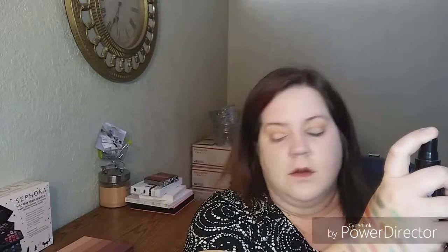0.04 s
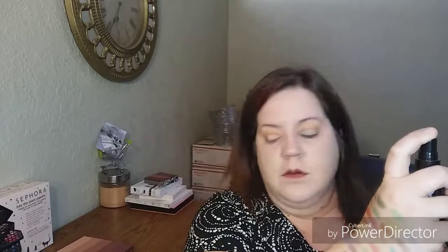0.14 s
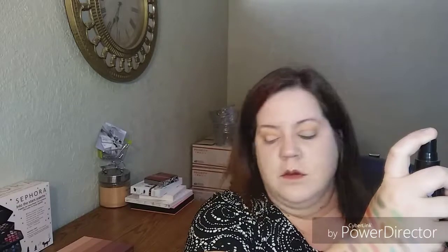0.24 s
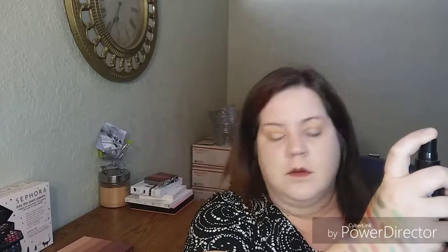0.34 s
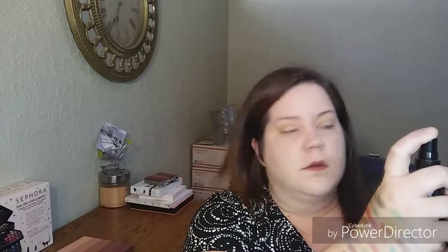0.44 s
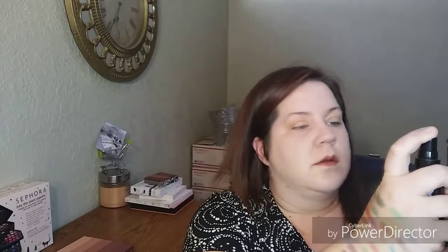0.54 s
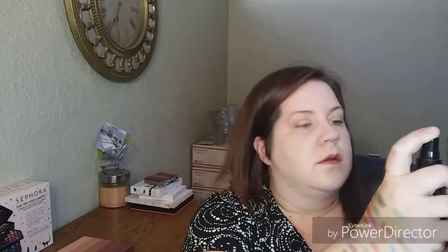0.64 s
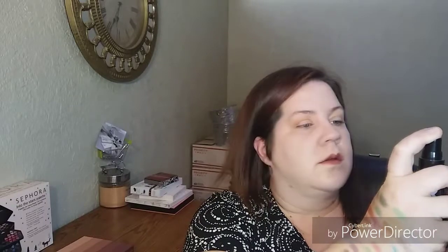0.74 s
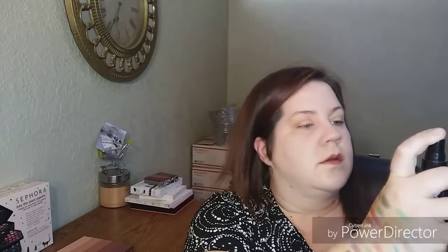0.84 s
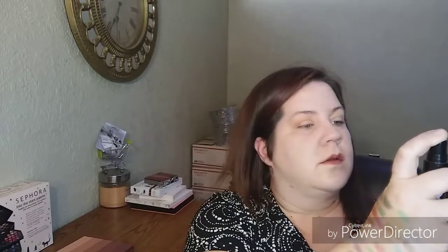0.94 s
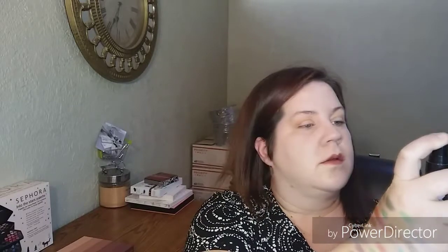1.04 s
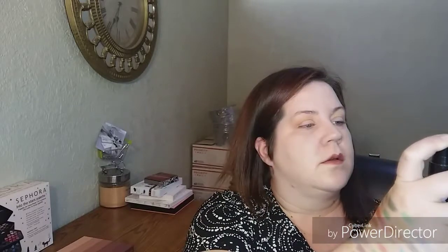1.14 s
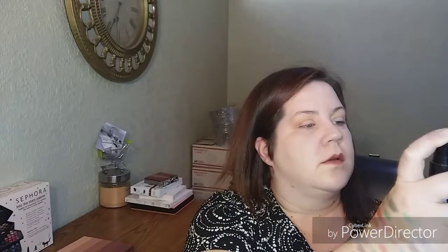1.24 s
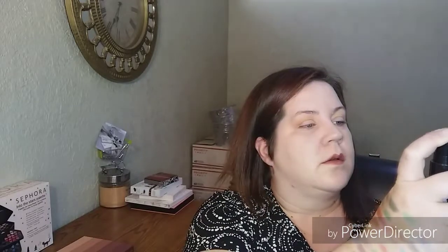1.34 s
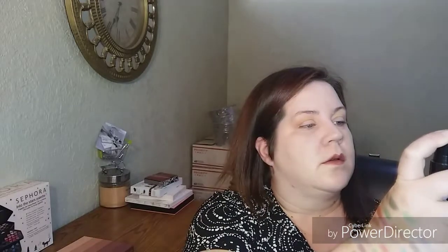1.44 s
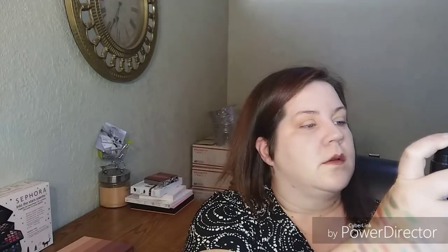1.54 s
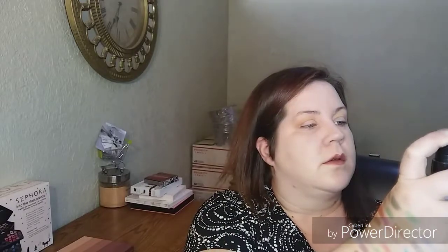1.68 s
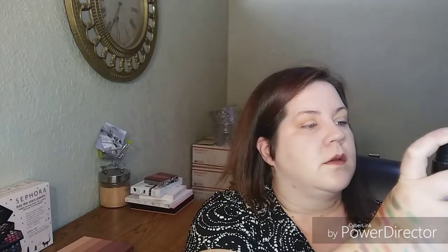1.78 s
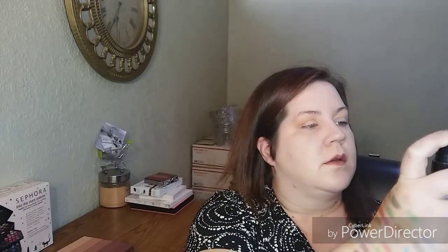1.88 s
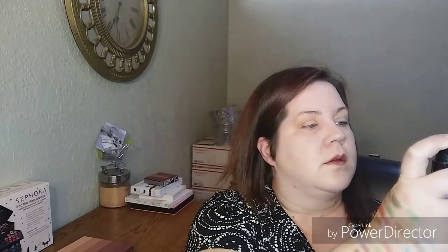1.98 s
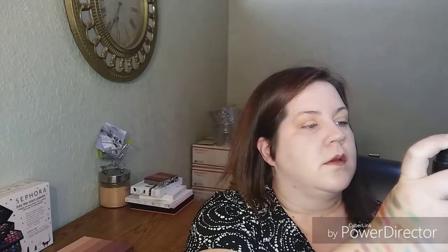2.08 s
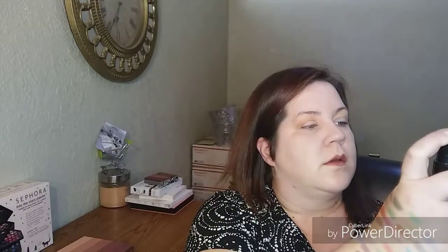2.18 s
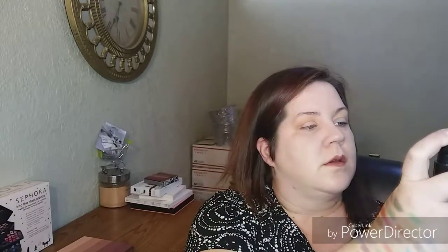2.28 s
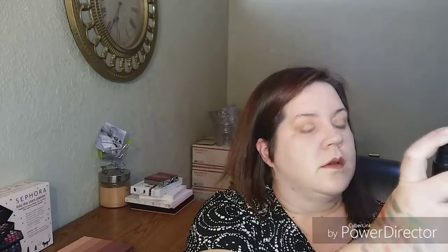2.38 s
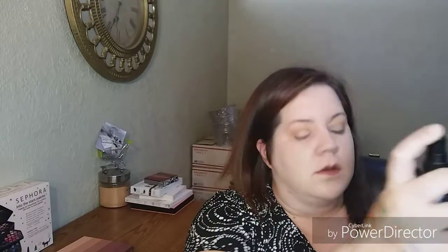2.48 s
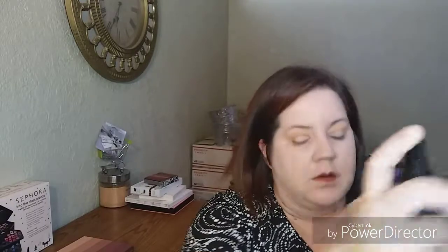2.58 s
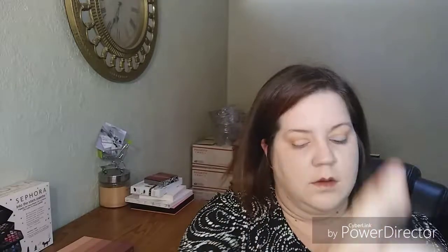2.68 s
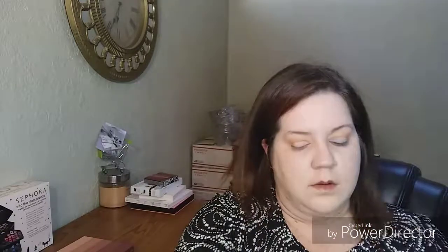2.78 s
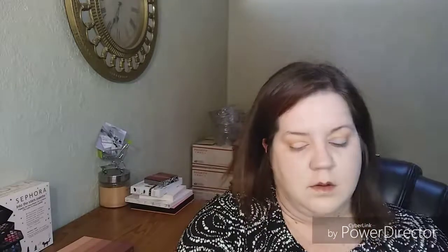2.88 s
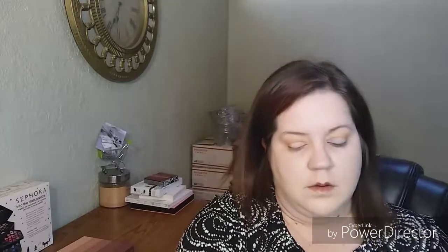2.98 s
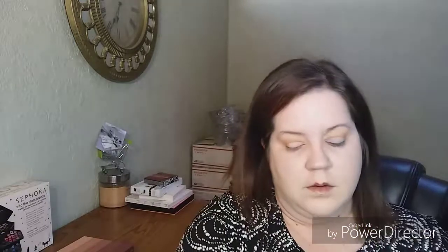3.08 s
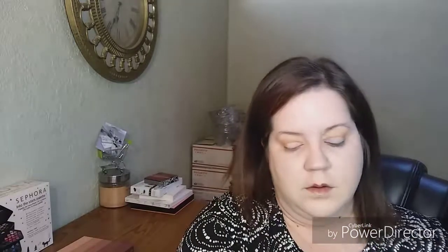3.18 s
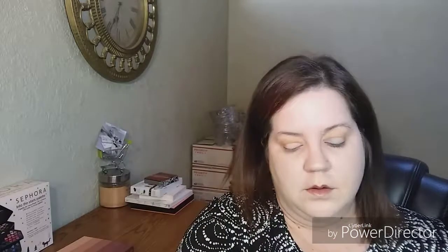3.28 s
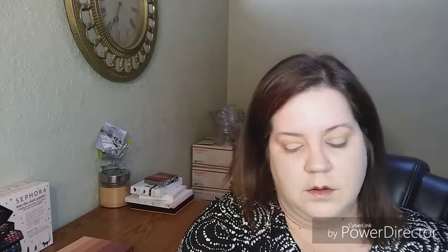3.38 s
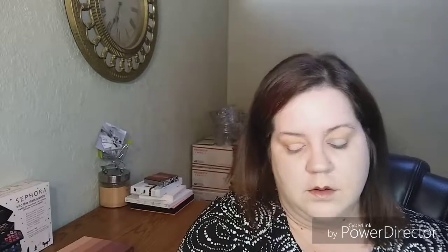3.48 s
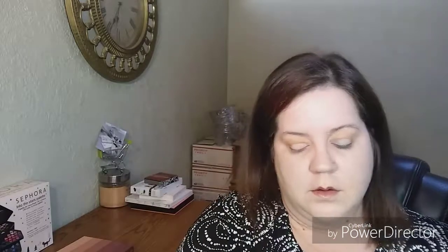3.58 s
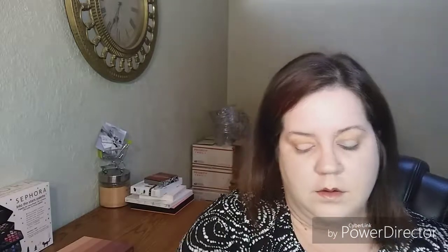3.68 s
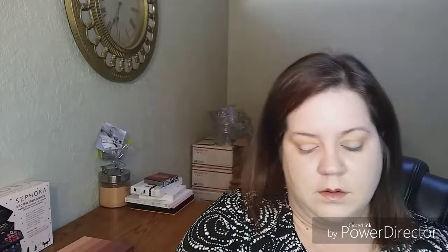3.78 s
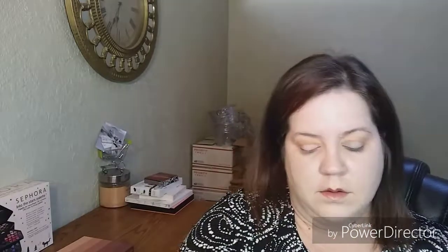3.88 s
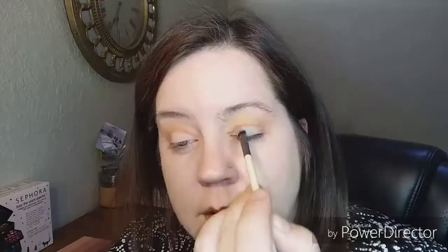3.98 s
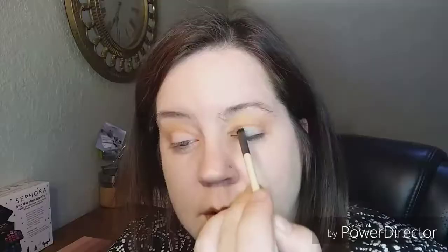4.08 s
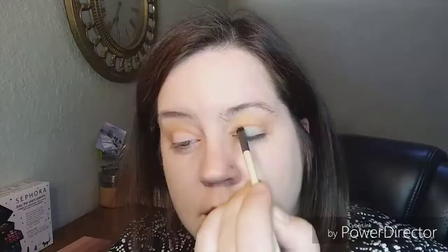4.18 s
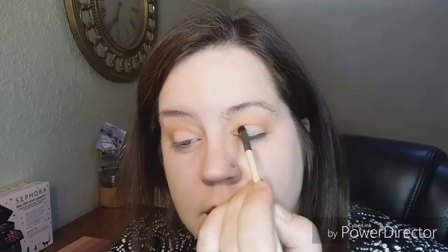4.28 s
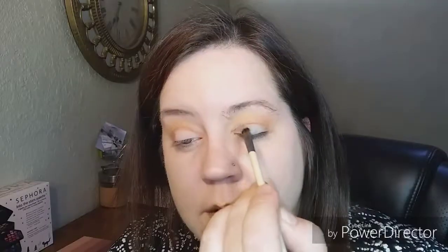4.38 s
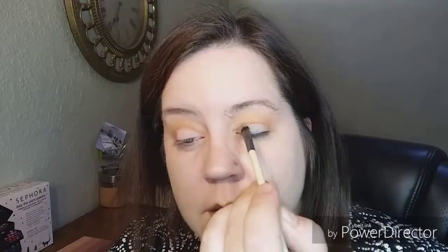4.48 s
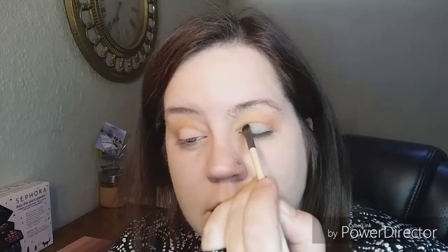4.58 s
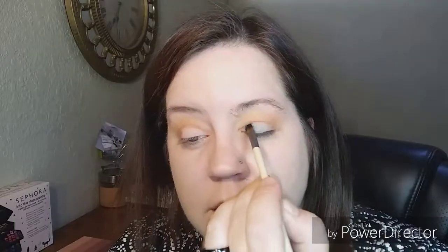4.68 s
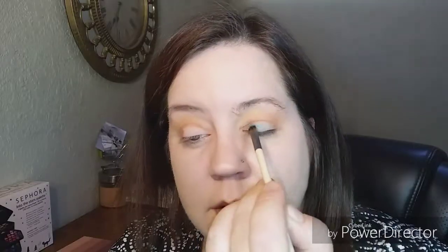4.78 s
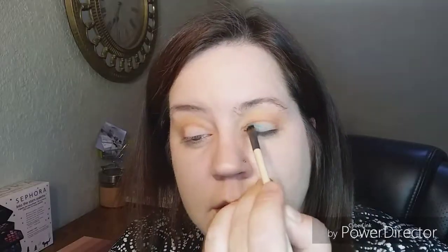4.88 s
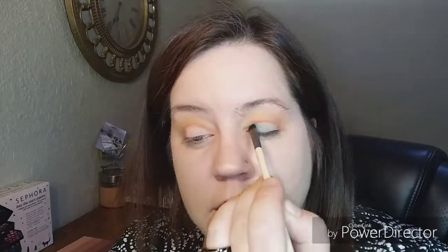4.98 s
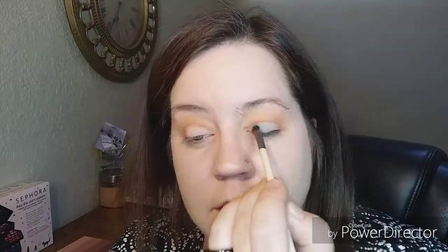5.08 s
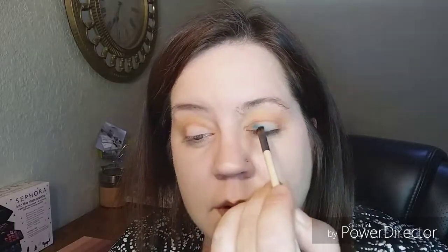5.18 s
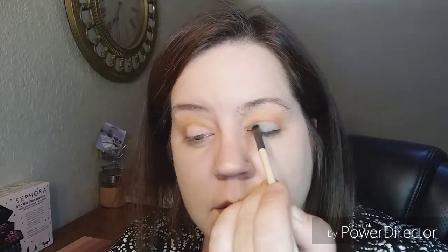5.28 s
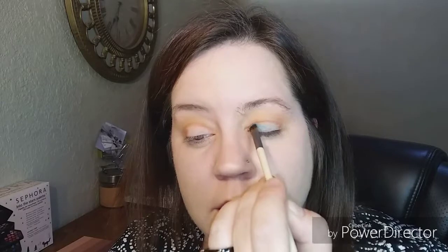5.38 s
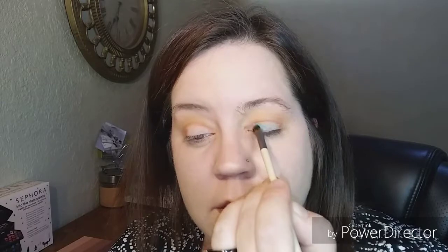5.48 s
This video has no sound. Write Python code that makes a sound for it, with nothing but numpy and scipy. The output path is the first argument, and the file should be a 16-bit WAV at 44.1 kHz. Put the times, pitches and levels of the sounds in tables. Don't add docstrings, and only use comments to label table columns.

```python
import sys
import numpy as np
from scipy import signal
from scipy.fft import rfft, irfft
from scipy.io import wavfile
from scipy.ndimage import uniform_filter1d

SR = 44100
rng = np.random.default_rng(int(sys.argv[2]) if len(sys.argv) > 2 else 0)


def convert_level_to_amplitude(level_db):
    exponent = np.asarray(level_db, float) / 20
    return 10 ** exponent


def transcribe(u):
    v = np.clip(np.atleast_2d(u).T, -1, 1)
    q = np.round(v * 32767).astype(np.int16)
    wavfile.write(sys.argv[1], SR, q)


N = 243873

# start_s, depth, half_width_s, after_dip_share
SHARP_SNAP = (4.047795, 1.0, .000022, .2)


def evened(x):
    return x / np.sqrt(np.mean(x ** 2) + 1e-20)


def read(points, hz):
    f, value = np.transpose(points)
    return np.interp(np.log(hz + 1), np.log(f + 1), value)


def curve(rows):
    rows = np.array(rows)
    return convert_level_to_amplitude(np.interp(np.arange(N) / SR, rows[:, 0], rows[:, 1], -150, -150))


def coloured(points):
    spectrum = rfft(rng.standard_normal(N))
    return evened(irfft(spectrum * convert_level_to_amplitude(read(points, np.fft.rfftfreq(N, 1 / SR))), N))


def wander(seconds):
    size = max(round(seconds * SR), 2)
    return evened(uniform_filter1d(uniform_filter1d(rng.standard_normal(N), size), size))


def band(x, lo_hz, hi_hz):
    sos = signal.butter(2, [lo_hz, min(hi_hz, SR / 2.2)], "band", fs=SR, output="sos")
    return signal.sosfilt(sos, x)


def ring(modes, rise_s):
    t = np.arange(SR // 2) / SR
    out = sum(convert_level_to_amplitude(db - 60 * t / t60) * np.sin(2 * np.pi * hz * t) for hz, db, t60 in modes)
    out = out * (1 - np.exp(-t / rise_s))
    return out / abs(out).max()


def grit(t60, lo_hz, hi_hz):
    t = np.arange(2000) / SR
    noise = evened(band(rng.standard_normal(len(t)), lo_hz, hi_hz))
    return noise * convert_level_to_amplitude(-60 * t / t60) * np.minimum(t / 0.0016, 1)


def add(mix, s, sound):
    part = mix[round(s * SR):][:len(sound)]
    part += sound[:len(part)]


def room(x):
    # pitch_hz, t60_s
    decay = [(200, 0.3), (1000, 0.84), (5000, 0.53), (9000, 0.42), (15000, 0.14)]
    taps = np.zeros(SR // 2)
    at = np.arange(300, len(taps) - 20, 20)
    taps[at + rng.integers(0, 20, len(at))] = rng.choice([-1., 1.], len(at))
    hz, t, z = signal.stft(taps, SR, nperseg=256)
    tail = signal.istft(z * convert_level_to_amplitude(-60 * t / read(decay, hz)[:, None]), SR, nperseg=256)[1]
    return signal.fftconvolve(x, tail / np.linalg.norm(tail))[:N]


def air():
    # pitch_hz, level_db (per Hz)
    floor = [(15, -16), (25, -14), (144, -10), (199, -6), (298, -6.5), (360, -4.5), (423, -6.5),
             (471, -6.5), (686, -10), (764, -12), (1110, -12.5), (7140, -21), (9100, -29), (14000, -21.5),
             (15600, -24)]
    noise = coloured(floor)
    above_bass = signal.sosfilt(signal.butter(4, 800, "high", fs=SR, output="sos"), noise)
    level_db = -54
    return noise / above_bass.std() * convert_level_to_amplitude(level_db) * convert_level_to_amplitude(.35 * wander(.06))


def hum():
    mains_orders = (2, 6, 8, 10)
    shaft_orders = (1, 2, 4, 5, 6, 8, 9, 13, 17)
    mains_db = [-64.5, -58, -65.5, -71]
    shaft_db = [-64.5, -66.5, -72.5, -73, -77, -77, -72, -72, -73]
    # pitch_hz, level_db (rms), phase_wander_rad
    fan_lines = [(195.12, -63.5, .25), (246.5, -62, 1.6)]
    # pitch_hz, level_db (rms), steadiness_s
    whine = [(1024, -78, 0.049), (6390, -80, 0.021), (7120, -74, 0.012)]
    # pitch_hz, width_hz, level_db (rms)
    drone_modes = [(195.4, 22, -61.5), (248.2, 10.6, -64), (357.9, 13.7, -67.5)]
    # time_s, level_db
    load = [(0, 9), (.3, -5), (.6, 0), (1.0, -1), (1.35, 5.5), (1.7, -1.5), (2.6, 0.5), (3.1, -1),
            (3.8, -2.5), (4.4, 2), (4.8, -0.5), (5.53, 1)]
    # time_s, level_db
    draught = [(0, 9), (.5, -6), (1.1, 6.5), (1.6, -4), (1.95, 7), (2.4, 2.5), (2.7, -18), (3.9, -13),
               (4.3, -1), (5.53, -11)]
    mains_hz, shaft_hz, in_step_s = 59.99, 59.2, -.05
    t = np.arange(N) / SR
    orders = [(k * mains_hz, db) for k, db in zip(mains_orders, mains_db)]
    orders += [(k * shaft_hz, db) for k, db in zip(shaft_orders, shaft_db)]
    sway = curve(load) * convert_level_to_amplitude(1.8 * wander(0.3))
    lines = []
    for hz, db in orders:
        swell = sway if hz > 300 else 1
        lines.append(convert_level_to_amplitude(db) * swell * np.cos(2 * np.pi * hz * (t - in_step_s)))
    for (hz, db, turn), gust in zip(fan_lines, (1, curve(draught))):
        lines.append(convert_level_to_amplitude(db) * gust * np.cos(2 * np.pi * hz * t + turn * wander(0.12)))
    for hz, db, steady_s in whine:
        lines.append(convert_level_to_amplitude(db) * np.cos(2 * np.pi * hz * t + 3.5 * wander(steady_s)))
    drones = 0
    for hz, width, db in drone_modes:
        drones = drones + convert_level_to_amplitude(db) * evened(band(rng.standard_normal(N), hz - width / 2, hz + width / 2))
    return np.sqrt(2) * sum(lines) + drones


def noise_fill(mono):
    # time_s, low_hz, high_hz
    flecks = [(1.185, 6100, 8300), (1.49, 4700, 5800), (1.835, 5100, 6400), (2.16, 8900, 11900)]
    flecks_per_s = 6
    chance = []
    for place, f, w in rng.random((round(flecks_per_s * N / SR), 3)):
        s, lo_hz = place * N / SR, 4500 + 8000 * f
        if not 1.05 < s < 2.2:
            chance.append((s, lo_hz, lo_hz + 1000 + 1500 * w))
    hz, t, z = signal.stft(mono, SR, nperseg=2048, noverlap=1024)
    side = np.zeros_like(z)
    for s, lo_hz, hi_hz in flecks + chance:
        rows, frame = (hz > lo_hz) & (hz < hi_hz), abs(t - s).argmin()
        noise = evened(rng.standard_normal((rows.sum(), 2))) @ [1, 1j]
        side[rows, frame] = noise * abs(z[rows, frame]).mean()
    return convert_level_to_amplitude(-5.5) * signal.istft(side, SR, nperseg=2048, noverlap=1024)[1][:N]


def snap():
    s, depth, width, after = SHARP_SNAP
    t = np.arange(N) / SR - s
    spike = 1.08 * np.exp(-.5 * (t / width) ** 2)
    rebound = 0.36 * np.exp(-((t - .00005) / width) ** 2)
    after_dip = after * np.exp(-((t - .00009) / width) ** 2)
    return -depth * (spike - rebound + after_dip)


def desk():
    # start_s, peak_db
    desk_hits = [
        (3.3368, -22),
        (3.563, -35),
    ]
    # pitch_hz, level_db, t60_s
    desk_modes = [(163.6, 3.5, 0.51), (219, 8, 0.45), (244, -1, 0.15), (281, -7, 0.11), (368.3, 10.5, 0.13),
                  (520, -3, 0.12), (580, -8, 0.13), (668, 4, 0.11), (734, -4, 0.11), (873, -2, .1)]
    # pitch_hz, level_db, t60_s
    shell_modes = [(1430, -10, .02), (2140, -6, .02), (2225, -2, 0.022), (3080, -8, .02), (4700, -11, .015)]
    # start_s, peak_db, pitch_hz, t60_s, rise_s
    blows = [(3.3366, -12, 330, 0.024, 0.0015), (3.337, -17, 629, 0.046, 0.0015),
             (3.342, -15, 525, 0.027, 0.00078), (3.347, -17.5, 202.4, 0.052, 0.0048),
             (3.3607, -16, 269, 0.034, 0.0025), (3.375, -24, 614, 0.017, 0.0014),
             (3.388, -32, 209, 0.04, 0.0038), (3.411, -34, 173.5, 0.17, .005),
             (3.426, -38, 196, 0.049, 0.0042), (3.537, -31, 257, 0.035, 0.0055),
             (3.547, -24.5, 280, 0.05, 0.0045), (3.560, -35, 692, 0.071, 0.0021),
             (3.566, -27.5, 261, 0.11, 0.0051), (3.577, -37, 274, 0.1, 0.0056),
             (3.592, -36, 335, 0.045, 0.0029), (3.604, -45, 248, .06, .003), (3.627, -38, 297, 0.029, .002)]
    # start_s, level_db, t60_s
    rattle = (3.345, -42, .3)
    # start_s, shell_ring_db, grit_db
    edge_hits = [
        (3.337, -21, -30.5),
        (3.349, -30, -38),
        (3.356, -27.5, -42),
        (3.363, -30, -49),
        (3.374, -44, -46),
        (3.561, -45, -53),
    ]
    # pitch_hz, level_db (per Hz)
    scrape = [(300, -18), (550, 1), (750, -0.5), (1000, -8.5), (1800, -13), (5000, -15.5), (8000, -24.5),
              (12000, -50)]
    # time_s, level_db
    slide = [
        (3.503, -62),
        (3.508, -43),
        (3.525, -41.5),
        (3.545, -46),
        (3.565, -42),
        (3.64, -58),
    ]
    thuds, cracks = np.zeros(N), np.zeros(N)
    for s, db in desk_hits:
        add(thuds, s, convert_level_to_amplitude(db) * ring(desk_modes, 0.0048))
    for s, db, hz, t60, rise_s in blows:
        add(thuds, s, convert_level_to_amplitude(db) * ring([(hz, 0, t60)], rise_s))
    s, db, t60 = rattle
    t = np.arange(SR // 4) / SR
    add(thuds, s, convert_level_to_amplitude(db - 60 * t / t60) * evened(band(rng.standard_normal(len(t)), 670, 3000)))
    for s, ring_db, grit_db in edge_hits:
        add(cracks, s, convert_level_to_amplitude(ring_db) * ring(shell_modes, 0.00055))
        add(cracks, s, convert_level_to_amplitude(grit_db) * grit(0.022, 1000, 6300) + convert_level_to_amplitude(ring_db - 15) * grit(0.075, 850, 1500))
    rough = evened(coloured(scrape) * convert_level_to_amplitude(2.0 * wander(0.0008)))
    return thuds + rough * curve(slide), cracks


def bottle():
    # start_s, peak_db, pitch_hz, brightness_db
    knocks = [(.002, -43, 565, -10), (1.693, -56, 650, -3), (1.109, -37.5, 633, -3), (1.121, -43, 616, -8),
              (1.293, -49.5, 732, -13), (1.338, -45, 668, 3), (1.497, -44.5, 625, 5), (1.572, -44, 585, 7),
              (1.761, -47, 707, 0), (1.815, -45.5, 647, -15), (1.935, -34.5, 627, 1), (1.944, -37, 640, 4),
              (1.951, -47, 634, 4), (1.984, -45, 752, 5), (2.133, -51, 686, -12), (2.206, -46, 647, 4),
              (2.752, -42, 642, 4), (2.775, -45.5, 653, 2)]
    # start_s, peak_db, pitch_hz
    ticks = [(2.5476, -40, 3180), (2.578, -39.5, 6440), (2.7487, -41, 4700), (2.7574, -44, 7110),
             (2.7716, -41, 4630), (2.7736, -35, 4650), (2.7864, -52, 7100)]
    # start_s, peak_db
    cap_click = (2.7498, -27)
    # start_s, peak_db, t60_s
    fingers = [
        (2.53, -58, 0.68),
        (2.578, -60, .25),
        (2.748, -49.5, 0.37),
        (2.832, -55.5, 0.64),
        (3.62, -58.5, 2.4),
        (3.8, -61.5, 0.84),
    ]
    out = np.zeros(N)
    for s, db, hz, bright_db in knocks:
        start = s - .0015
        add(out, start, convert_level_to_amplitude(db + 1) * ring([(hz, 0, .05), (1.18 * hz, -4, .04)], .0018))
        add(out, start, convert_level_to_amplitude(db + min(bright_db, 4)) * band(grit(.012, 900, 3000), 800, 3500))
    for s, db, hz in ticks:
        add(out, s, convert_level_to_amplitude(db + 1.5) * grit(0.014, hz, 1.06 * hz) + convert_level_to_amplitude(db - 14) * grit(0.0067, 1300, 13000))
    s, db = cap_click
    add(out, s, 2 * convert_level_to_amplitude(db) * band(np.arange(200) == 0, 1200, 10700))
    rub = evened(band(rng.standard_normal(N), 3860, 7300) * convert_level_to_amplitude(1.8 * wander(0.0018)))
    t = np.arange(N) / SR
    strength = np.zeros(N)
    for s, db, t60 in fingers:
        dying = convert_level_to_amplitude(db - 60 * np.clip(t - s, 0, t60 / 4) / t60)
        strength += dying * np.clip((t - s) / .006, 0, 1) * (t < s + t60 / 4)
    return out + rub * strength


def pressure(start, length, peak_db, sag_db, fizz_db):
    crest, build_db, sag_power = 0.53, -3.5, 2.56
    open_db, open_s, shut_s = -3, 0.0058, 0.0088
    t = np.arange(N) / SR - start
    u = np.clip(t / length, 0, 1)
    build = build_db * np.maximum(1 - u / crest, 0)
    db = build + sag_db * np.maximum((u - crest) / (1 - crest), 0) ** sag_power
    opening = convert_level_to_amplitude(open_db * np.exp(-u * length / open_s)) * (t > 0)
    opening = opening * np.clip((length - t) / shut_s + .5, 0, 1)
    return opening * np.array([convert_level_to_amplitude(peak_db + db), convert_level_to_amplitude(fizz_db + db / 2)])


def spray():
    # start_s, length_s, peak_db, end_sag_db, fizz_db
    strokes = [
        (1.108, 0.099, -27.5, -6, -44),
        (1.572, 0.13, -26.5, -10, -48),
        (1.984, 0.17, -26.5, -15, -48),
    ]
    # pitch_hz, level_db (per Hz)
    jet_spectrum = [(900, -27), (1500, -17.5), (2600, -15.5), (4200, -9.5), (5700, -5.5), (7300, -7.5),
                    (8900, -17.5), (12000, -15.5), (14500, -24), (15600, -31)]
    # start_s, peak_db
    spits = [
        (1.1085, -24),
        (1.1185, -21.5),
        (1.1314, -22.5),
    ]
    # pitch_hz, width_hz, gain_db
    cap_modes = [(1600, 140, 7), (2885, 120, 8), (3280, 170, 10), (3830, 200, 2.5), (4580, 340, 6.5),
                 (5080, 350, 7.5), (6520, 830, 8.5), (8260, 400, 5), (9580, 420, 7), (11100, 500, 3),
                 (12700, 460, 5), (13700, 450, 4)]
    jet = coloured(jet_spectrum)
    top = evened(band(jet, 9900, 16000))
    gains = sum(pressure(*row) for row in strokes)
    flow, fizz = uniform_filter1d(gains, size=60, origin=29, axis=1)
    jet = flow * jet + fizz * top
    for s, db in spits:
        burst = evened(band(rng.standard_normal(900), 12000, 14600))
        add(jet, s, convert_level_to_amplitude(db - 3.5 - 60 * np.arange(900) / SR / 0.015) * burst)
    hz = np.fft.rfftfreq(N, 1 / SR)
    cap_db = sum(db * np.exp(-.5 * ((hz - f) / (width / 2)) ** 2) for f, width, db in cap_modes)
    return jet, irfft(rfft(jet) * convert_level_to_amplitude(cap_db - 4.5), N)


def scene():
    jet, direct = spray()
    taps = bottle()
    thuds, cracks = desk()
    echo = room(convert_level_to_amplitude(-14) * jet + convert_level_to_amplitude(-17.5) * taps + convert_level_to_amplitude(-12) * thuds + convert_level_to_amplitude(-24) * cracks)
    mono = direct + taps + thuds + cracks + echo + hum() + air()
    return np.array([mono, mono])


def roll_off(x):
    return signal.sosfilt(signal.butter(12, 16380, fs=SR, output="sos"), x)


def record(dry):
    mic_hz, edge_hz = 52, 15540
    mono = signal.sosfilt(signal.butter(2, mic_hz, "high", fs=SR, output="sos"), dry[0])
    mono = mono + snap() - .0003
    mono = signal.oaconvolve(mono, signal.firwin(1023, edge_hz, window=("kaiser", 9), fs=SR), "same")
    since_snap = np.arange(N) / SR - SHARP_SNAP[0]
    gap = np.interp(since_snap, [.0028, .0038, .007, .008], [0, 1, 1, 0])
    dull = signal.oaconvolve(mono, signal.firwin(129, 600, fs=SR), "same")
    mono = mono - gap * (mono - dull)
    side = noise_fill(mono)
    return roll_off(np.clip([mono + side, mono - side], -1, 1))


dry = scene()
out = record(dry)
transcribe(out)
```